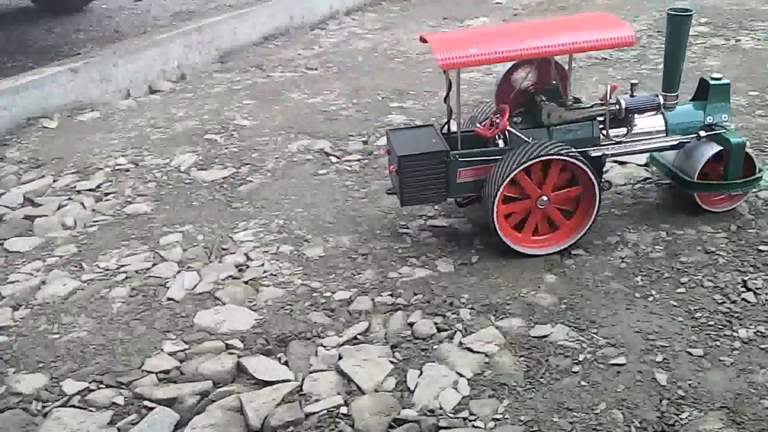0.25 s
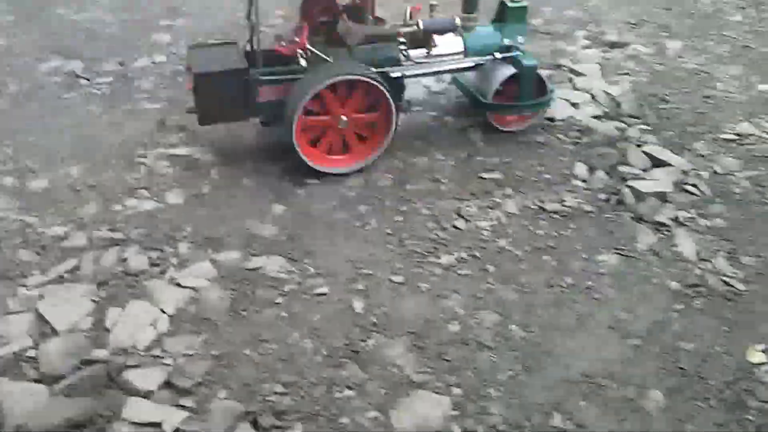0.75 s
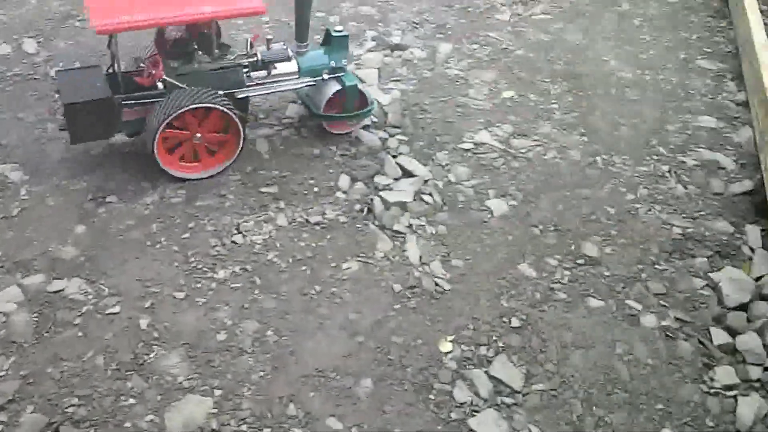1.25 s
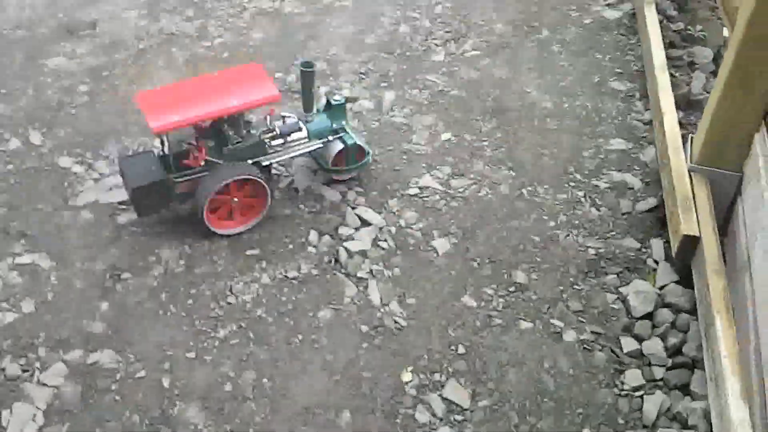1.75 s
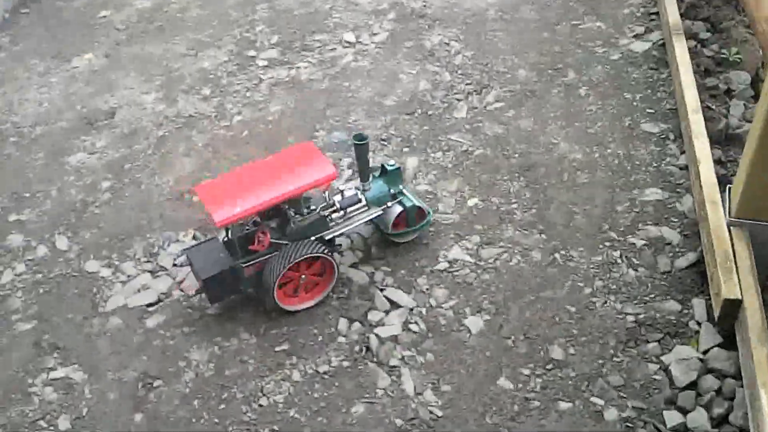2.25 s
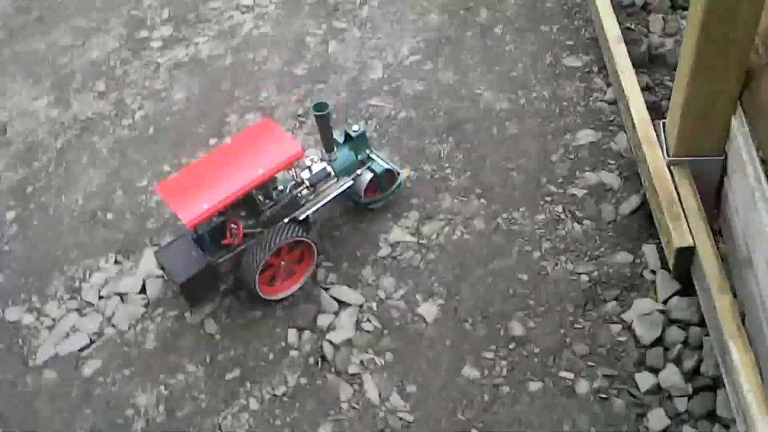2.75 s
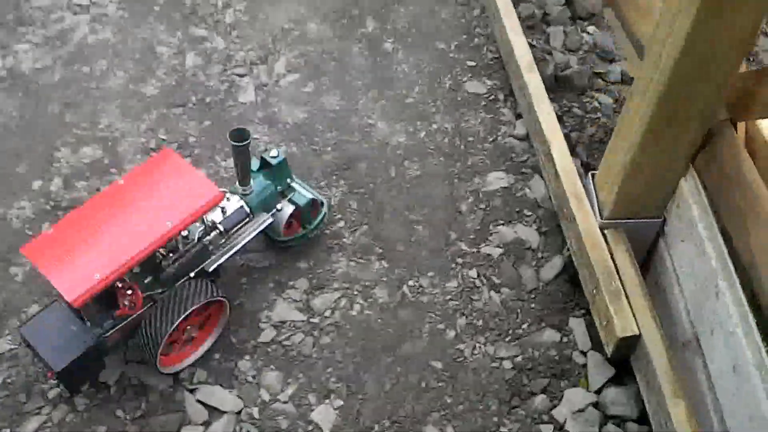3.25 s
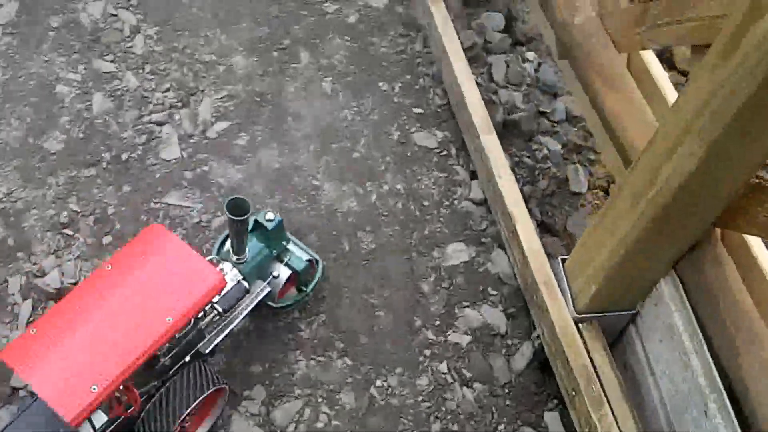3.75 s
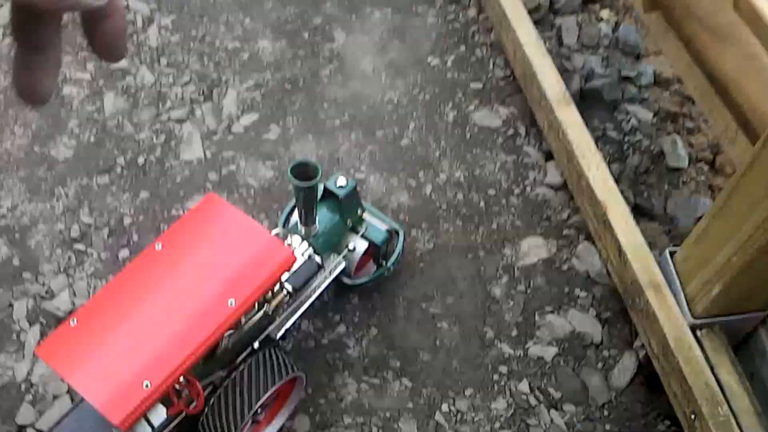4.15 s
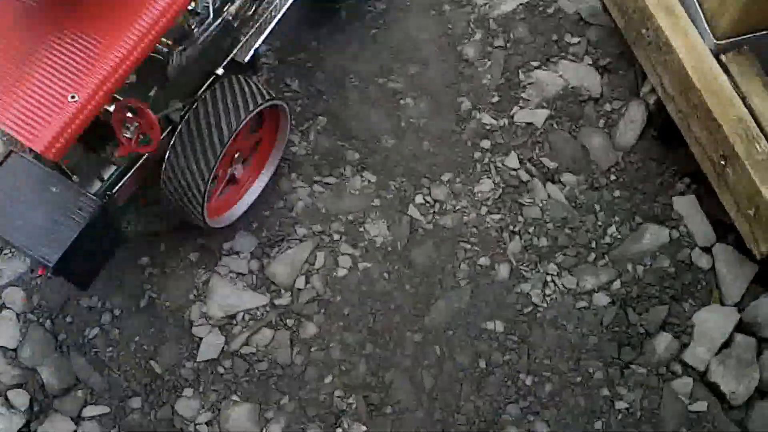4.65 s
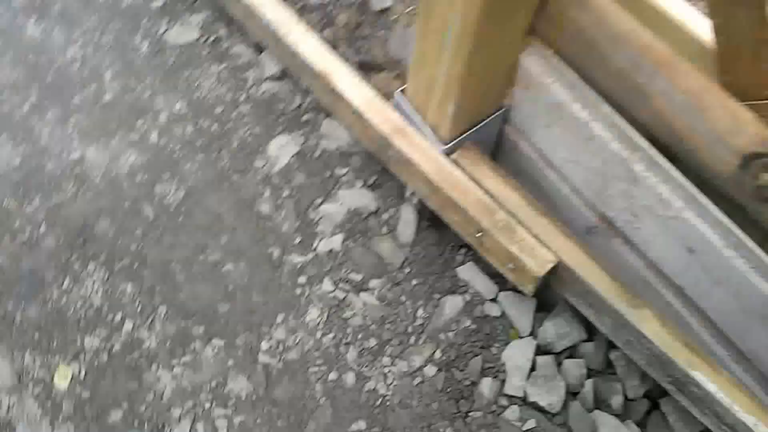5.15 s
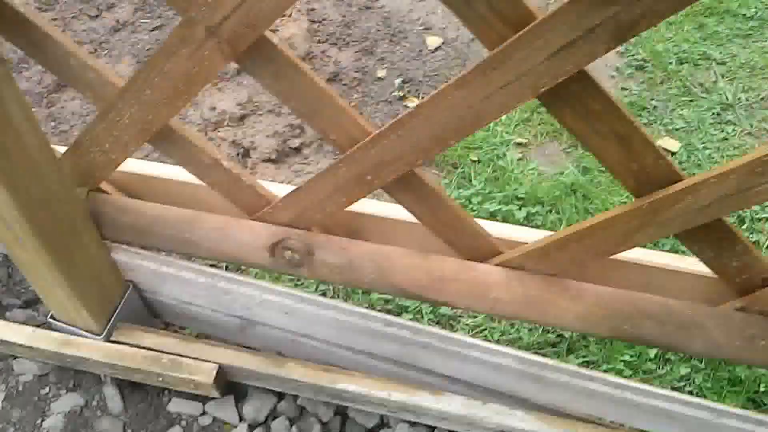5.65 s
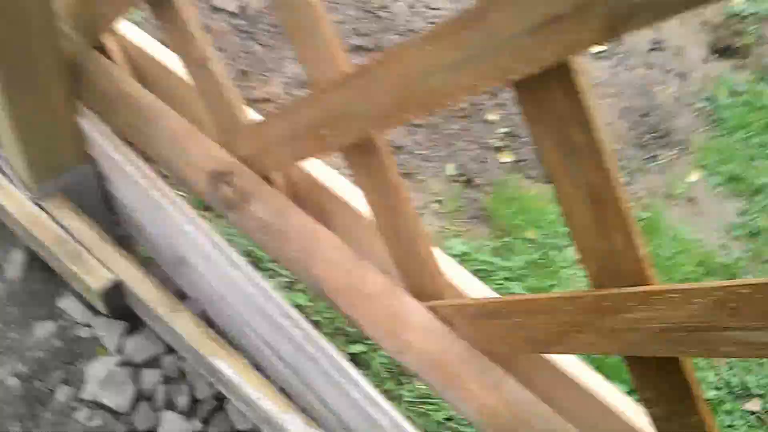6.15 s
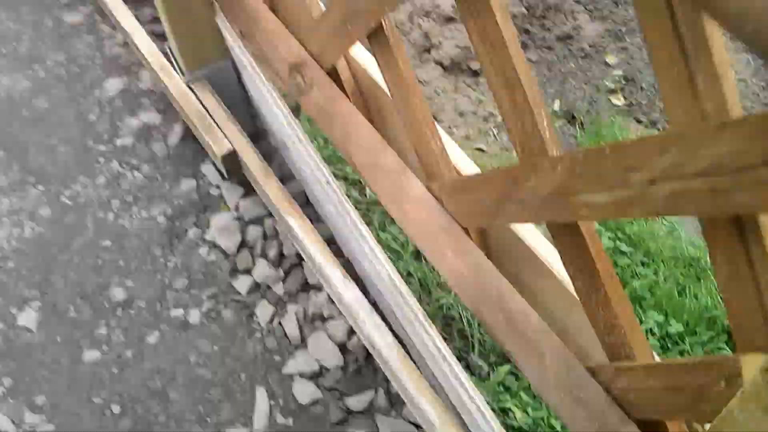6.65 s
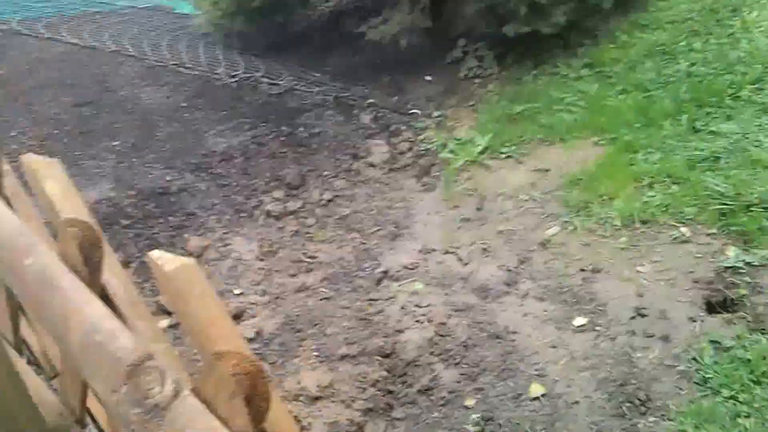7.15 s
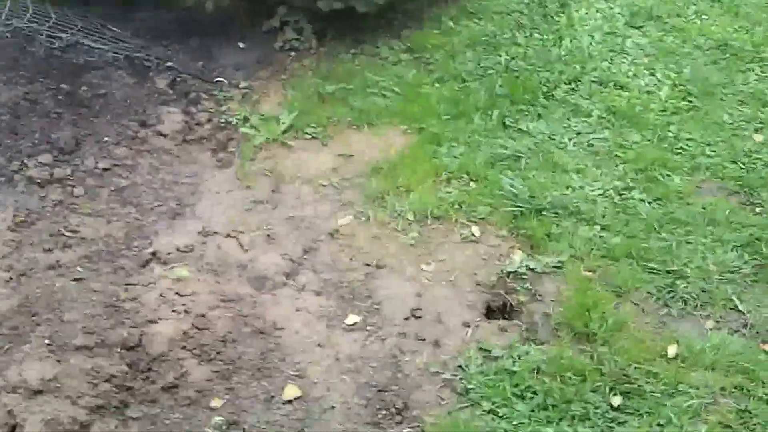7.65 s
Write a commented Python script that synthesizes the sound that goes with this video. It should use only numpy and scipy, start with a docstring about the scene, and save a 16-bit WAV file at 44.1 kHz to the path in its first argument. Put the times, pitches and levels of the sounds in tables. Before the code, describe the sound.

A model steam roller runs close by outdoors with a fast, even chuffing and tinny clatter, grit crunching under its wheels and loose steel jingling. Early on a stone snaps loudly and the sound dips for over a second. The rolling continues with ticks and clinks. After about five seconds the engine runs free and speeds up, with knocking linkage, rattling gears, a low hum and a thin squeal.

```python
"""A model steam roller clatters over gritty ground, close by outdoors, at about 18 crank turns a second.
Each power stroke chuffs and shakes the tin body, grit crunches under the wheels, loose steel jingles.
One loud stone snap early on makes the recorder duck for over a second.
After five seconds the engine loses its load and speeds up: the slack linkage knocks several times
a turn over a chassis hum, rattling gears and a thin squeal."""
import sys
import numpy as np
from scipy import signal
from scipy.fft import rfft, irfft
from scipy.io import wavfile
from scipy.ndimage import uniform_filter1d

SR = 44100
rng = np.random.default_rng(int(sys.argv[2]) if len(sys.argv) > 2 else 0)


def dump_mix(stems):
    """Bounce the given channels to the path in sys.argv[1] as a 16-bit WAV at rate SR."""
    frames = np.atleast_2d(stems).T  # one column per channel
    limited = np.clip(frames, -1, 1)  # hard clip at full scale
    pcm = np.round(limited * 32767).astype(np.int16)
    wavfile.write(sys.argv[1], SR, pcm)


N = 347508

# the machine's even running between surges: t/s, clatter/dB, rumble/dB, jingle/dB
RUNNING_LEVELS = [(0, -41, -55, -48), (0.7, -41, -45.5, -43.5), (1.9, -48, -52.5, -52),
                  (2.6, -39.5, -48.5, -44.5), (2.9, -44, -50.5, -49.5), (3.5, -39.5, -47.5, -48),
                  (4.0, -43.5, -47.5, -54.5), (4.3, -33.5, -39, -44), (4.6, -41, -48.5, -48),
                  (4.98, -35, -46.5, -54), (5.08, -43.5, -45, -54.5), (5.4, -46.5, -52, -54.5),
                  (6.1, -39, -43.5, -48), (6.5, -36, -45.5, -49), (7.3, -33, -38, -45),
                  (7.55, -40, -40, -44), (7.65, -44.5, -47, -45.5), (7.88, -33, -41, -47)]
# knocks in one turn with no load: start/turns, strength, rise/turns, decay/turns
FREE_STROKES = [(-.01, .7, .02, .06), (.14, .55, .025, .12), (.335, 1.6, .035, .1), (.49, .6, .03, .07),
                (.715, 1.55, .045, .08)]
# tin body resonances, under load and running light: f/Hz, width/Hz, lift/dB
LOADED_BODY = [(207, 320, 9), (430, 59, 11.5), (826, 180, 8), (1300, 13, 11), (1600, 17, 13), (1754, 66, 9),
               (2025, 66, 13), (2380, 56, 9), (5120, 320, 9.5)]
FREE_BODY = [(346, 40, 2), (647, 59, 5), (1337, 51, 2), (1800, 130, 4.5), (2520, 320, 6.5)]
# modes of the loose steel parts: f/Hz, level/dB, t60/s
STEEL_MODES = [(4860, -23, .07), (6150, -22, .07), (7950, -27, .07), (8330, -19.5, .11), (8600, -11, .025),
               (8685, -3, .046), (8775, -2.5, .036), (11210, -32, .09), (11375, -29, .13),
               (11510, -25, .085), (12855, -11.5, .042), (12900, -14, .02), (15070, -21, .05)]


def from_db(db):
    """Decibels to gain."""
    return 10 ** (np.asarray(db) / 20)


def rms_one(x):
    """Scale to unit power."""
    return x / np.sqrt(np.mean(x ** 2) + 1e-20)


def in_time(rows):
    """Breakpoint rows (time first) to one curve per remaining column."""
    times, *columns = np.transpose(rows)
    return [np.interp(np.arange(N) / SR, times, column) for column in columns]


def filtered(x, order, hz, kind="low"):
    """Butterworth low-, high- or band-pass."""
    return signal.sosfilt(signal.butter(order, hz, kind, fs=SR, output="sos"), x)


def drift(rate):
    """Smooth random wander of spread 1 that changes about rate times a second."""
    hop, settle = 40, 2000
    pole = np.exp(-2 * np.pi * rate * hop / SR)
    noise = rng.standard_normal(N // hop + settle + 2)
    slow = signal.lfilter([1], [1, -2 * pole, pole * pole], noise)[settle:]
    return np.interp(np.arange(N) / hop, np.arange(len(slow)), rms_one(slow))


def evened(x):
    """Hold the power steady over a tenth of a second, keeping the fast detail."""
    return x / np.sqrt(np.abs(uniform_filter1d(x ** 2, size=SR // 10)) + 1e-12)


def coloured(x, spectrum, resonances=(), size=4096):
    """Minimum-phase EQ of unit power gain: a smooth curve lifted by resonances."""
    hz = np.maximum(np.arange(size // 2 + 1) * SR / size, 1)
    curve_hz, curve_db = np.transpose(spectrum)
    db = np.interp(np.log(hz), np.log(curve_hz), curve_db)
    for centre, width, lift in resonances:
        db = db + lift / (1 + (2 * (hz - centre) / width) ** 2)
    cepstrum = irfft(np.log(from_db(db)))[:size // 2]
    response = irfft(np.exp(rfft(2 * cepstrum, size)))
    return signal.oaconvolve(x, response / np.linalg.norm(response))[:N]


def ring(clicks, hz, t60):
    """One mode: a unit click sets off a decaying sine of height 1."""
    pole, angle = from_db(-60 / (t60 * SR)), 2 * np.pi * hz / SR
    return signal.lfilter([0, np.sin(angle)], [1, -2 * pole * np.cos(angle), pole ** 2], clicks + 1e-18)


def grains(per_s, spread_db):
    """Random tiny contacts of uneven size; power 1."""
    sizes = from_db(spread_db * np.minimum(rng.exponential(1, N), 4)) * rng.choice([-1, 1], N)
    return rms_one(sizes * (rng.random(N) < per_s / SR))


def moving_band(hz, width_hz):
    """Noise in one resonance whose centre follows hz; power 1."""
    slow_noise = filtered(rng.standard_normal((2, N)), 1, width_hz / 2)
    real, imaginary = filtered(slow_noise, 2, 2 * width_hz)
    phase = 2 * np.pi * np.cumsum(hz) / SR
    return rms_one(real * np.cos(phase) + imaginary * np.sin(phase))


def surging_levels(release_s=0.02):
    """Clatter, rumble and jingle in dB: gravel crunches while rolling, rattle bursts running light."""
    # surges of clatter: t/s, length/s, rise/s, level/dB, rumble offset/dB, jingle offset/dB
    surges = [(-.01, 0.035, 0.0077, -34, -10, -12), (0.197, 0.081, 0.0058, -36, -20, -11),
              (0.408, 0.084, 0.0047, -39.5, -31, -11), (.503, 0.076, 0.0036, -36.5, -21, -4),
              (0.75, 0.092, 0.0032, -34, -13, -7), (0.952, 0.042, 0.0094, -31.5, -20, -5),
              (1.117, 0.08, 0.0041, -36.5, -18, -5), (1.206, 0.065, 0.0044, -37, -13, -3.5),
              (1.368, 0.1, 0.0049, -38.5, -18, -10), (1.483, 0.2, 0.005, -39.5, -19, -13),
              (1.688, 0.082, 0.021, -37.5, -18.5, -15), (1.986, 0.065, .002, -37.5, -14.5, -10),
              (2.16, 0.066, 0.0019, -39.5, -22, -12), (2.281, 0.15, 0.0078, -37, -30, -7.5),
              (2.551, 0.067, .003, -35.5, -13, -20), (2.723, 0.12, 0.0046, -38, -29, -22),
              (3.064, 0.061, 0.0033, -38.5, -13, -15), (3.117, 0.01, 0.0032, -34, -13, -15),
              (3.251, 0.08, 0.0073, -33.5, -10.5, -8.5), (3.399, 0.072, 0.0018, -30, -14.5, -17),
              (3.715, 0.092, 0.0029, -35, -24, -28), (3.818, 0.05, 0.014, -36.5, -13, -6),
              (4.028, 0.1, 0.029, -30, -12, -23), (4.384, 0.079, 0.0017, -28, -9.5, -16),
              (4.472, 0.019, .004, -33, -4, -15), (4.558, 0.0094, 0.002, -32.5, -29, -7),
              (4.628, 0.086, 0.007, -32.5, -20, -11.5), (4.858, 0.091, 0.053, -30, -17, -17),
              (5.11, 0.16, 0.017, -38, 2, -29), (6.252, 0.099, 0.06, -35, -12, -9.5),
              (6.603, 0.017, 0.01, -28, -14, -9), (7.551, 0.015, 0.0085, -26, -10, -15)]
    power = from_db(in_time(RUNNING_LEVELS)) ** 2
    for start, length, rise, db, rumble_offset, jingle_offset in surges:
        age = np.arange(N) / SR - start
        swell = np.clip(age / rise, 0, 1) * np.exp(-np.clip((age - length) / release_s, 0, 20))
        gains = from_db([[db], [db + rumble_offset], [db + jingle_offset]])
        power += (gains * swell) ** 2
    return 10 * np.log10(power)


def strokes(turns, pattern, uneven_db):
    """Pulses tied to the crank angle; no two turns are equally strong."""
    out = np.zeros(N)
    for start, strength, rise, decay in pattern:
        turn, angle = np.divmod(turns - start + 2, 1)
        force = strength * from_db(uneven_db * rng.standard_normal(size=256))[turn.astype(int)]
        out += force * np.minimum(angle / rise, 1) * np.exp(-np.maximum(angle - rise, 0) / decay)
    return out


def chuff_beat(turns, load, clatter_db):
    """The pulse of the power strokes under load; surges of clatter cover the puffs."""
    # puffs in one turn: start/turns, strength, rise/turns, decay/turns
    puffs = [(-.005, 1.5, .12, .115), (.35, .25, .09, .06), (.68, .42, .14, .3)]
    surge_db = clatter_db - in_time(RUNNING_LEVELS)[0]
    depth = np.sqrt(load) * from_db(-0.3 * surge_db)
    return 1 + depth * strokes(turns, puffs, uneven_db=2.6)


def clatter(load, beat, level_db):
    """Steam puffs, crunching grit and clumps of gear rattle sound through the tin body."""
    # tone under load and running light: f/Hz, level/dB
    loaded_eq = [(200, -27), (600, -12.5), (1000, 1.5), (1700, -2), (2800, -3), (4000, 2.5), (4600, -7.5),
                 (5500, 3.5), (7000, -2), (9000, -3.5), (10000, -10), (12500, -5.5), (15500, -41)]
    free_eq = [(200, -23), (600, -3.5), (1100, 2.5), (1700, 5.5), (2800, 4.5), (4000, 10.5), (5500, -2),
               (7000, 2.5), (8800, 2), (10300, -11), (12500, 1), (15500, -13.5)]
    contacts = grains(per_s=3500, spread_db=3.0) + 0.98 * rng.standard_normal(N)
    clumps = from_db(2.4 * drift(70))
    shaken = from_db(level_db) * evened(contacts * beat * clumps)
    loaded = coloured(shaken * np.sqrt(load), loaded_eq, LOADED_BODY)
    free = coloured(shaken * np.sqrt(1 - load), free_eq, FREE_BODY)
    return from_db(-2.57) * loaded + from_db(-6.5) * free


def hollow_note(load, beat, clatter_db):
    """Crunching under load sounds one hollow resonance that shifts as the roller moves."""
    # its centre: t/s, f/Hz
    glide = [(.6, 4240), (1.0, 3555), (2.7, 3734), (4.45, 3536)]
    note = moving_band(in_time(glide)[0], width_hz=260)
    return from_db(clatter_db - 8.5) * np.sqrt(load) * evened(beat * note)


def rumble(turns, load, beat, level_db):
    """The chassis shudders on rough ground; running light, it takes the same knocks on every turn."""
    # chassis tone: f/Hz, level/dB
    chassis_eq = [(30, -30), (60, -6), (130, -3), (250, -5.5), (450, 2), (750, -1), (1100, -6.5),
                  (2000, -16.5), (6000, -69)]
    roughness = grains(per_s=900, spread_db=0.5) + 0.5 * rng.standard_normal(N)
    jolts = evened(roughness * (beat + 1))
    kicks = sum(strength * np.diff(np.floor(turns - start - rise), prepend=-1)   # a click per stroke
                for start, strength, rise, _ in FREE_STROKES)
    blows = evened(jolts + 0.82 * (1 - load) ** 3 * rms_one(kicks))
    loaded = coloured(blows * np.sqrt(load), chassis_eq, LOADED_BODY)
    free = coloured(blows * np.sqrt(1 - load), chassis_eq, FREE_BODY)
    return from_db(level_db - 5.0) * (loaded + free)


def grit(beat, level_db, pitch_count=24, ring_cycles=45):
    """Crumbs of stone tick under the wheels, each with a brief pitch of its own."""
    cracks = evened(grains(per_s=420, spread_db=3.2) * beat) * from_db(level_db)
    pitch_index = rng.integers(0, pitch_count, N)
    pitches = np.geomspace(1500, 5600, pitch_count)
    ticks = sum(ring(cracks * (pitch_index == k), hz, ring_cycles / hz) * hz / pitches[-1]
                for k, hz in enumerate(pitches))
    return from_db(-15.5) * filtered(ticks, 2, 1200, "high")


def jingle(modes, shake, per_s, spread_db, clump_db):
    """Metal chatters with the shaking, each touch exciting the modes in new proportions."""
    touches = evened(grains(per_s, spread_db) * shake * from_db(clump_db * drift(24)))
    out, power = np.zeros(N), 0
    for hz, db, t60 in modes:
        out += from_db(db) * ring(touches * (1 + 0.52 * rng.standard_normal(N)), hz, t60)
        power += from_db(2 * db) * t60 * SR / (4 * np.log(1000))
    return out / np.sqrt(power)


def wheel_rims(beat, clatter_db, follow=0.57, reach_hz=250):
    """Grit and shaking ring the rims; single stones ping the modes that the struck spot favours."""
    # rim modes: f/Hz, level/dB, t60/s
    modes = [(2370, -9, .035), (3490, -3.5, .045), (3690, -3.5, .045), (4850, -.5, .065), (4930, -1, .055),
             (5260, -5, .035), (5560, -7, .06), (6120, -3.5, .065), (6205, -4, .065)]
    # rim chatter at average shaking: t/s, level/dB
    fader = [(0, -45.5), (0.6, -43), (1.0, -46), (2.0, -49), (2.6, -43), (3.7, -58.5), (4.3, -45),
             (5.5, -66), (6.3, -49), (7.88, -49)]
    # single stones: t/s, level/dB, favoured f/Hz
    stones = [(0.121, -29.5, 4890), (.21, -33, 4890), (.443, -32, 4890), (.755, -17, 5370),
              (1.556, -22, 5400), (2.505, -29.5, 6160), (2.608, -33, 4890), (2.693, -33, 4890),
              (3.514, -22.5, 5360), (4.288, -32, 4890)]
    level_db = in_time(fader)[0] + follow * (clatter_db - clatter_db.mean())
    out = from_db(level_db) * jingle(modes, beat, per_s=130, spread_db=3.8, clump_db=2.5)
    times, stone_db, favoured_hz = np.transpose(stones)
    for hz, db, t60 in modes:
        coupling = 1 / (1 + ((hz - favoured_hz) / reach_hz) ** 2)
        clicks = np.zeros(N)
        clicks[(times * SR).astype(int)] = from_db(stone_db + db) * coupling
        out += ring(clicks, hz, t60)
    return out


def outdoor_air():
    """A quiet bed of low outdoor noise with a trace of hiss."""
    # its tone: f/Hz, level/dB
    air_eq = [(25, -5), (65, 17.5), (130, 17), (250, 8), (600, -13), (2000, -75), (8000, -37), (15000, -32)]
    return from_db(-59.5) * coloured(rng.standard_normal(N), air_eq)


def tin_rasps(beat):
    """Dense slips crowd into the strokes and set one resonance of the tin sounding for a moment."""
    # rasps: t/s, length/s, level/dB, f/Hz, width/Hz
    rasps = [(0.02, 0.6, -54, 870, 149), (4.032, 0.096, -36.5, 1300, 700), (4.386, 0.13, -33.5, 1460, 800),
             (4.387, 0.072, -33, 3620, 300), (4.625, 0.11, -40.5, 1600, 220),
             (4.866, 0.099, -38.5, 1580, 222), (5.12, 0.207, -38.5, 1610, 1140),
             (6.282, 0.45, -50, 600, 129), (6.578, 0.41, -46, 1720, 200)]
    out = np.zeros(N)
    for start, length, db, hz, width in rasps:
        at, size = int(start * SR), int(length * SR)
        slips = beat[at:at + size] ** 2 * rng.standard_normal(size) * (rng.random(size) < .06)
        tone = filtered(slips, 2, [hz - width / 2, hz + width / 2], "band")
        out[at:at + size] += from_db(db) * rms_one(tone) * signal.windows.tukey(size, .4)
    return out


def steel_clinks(buzz_s=0.0073, size=1500):
    """Harder steel blows: a first contact, a brief buzz of rebounds, then the ring."""
    # blows: t/s, level/dB
    clinks = [(0.1216, -12), (0.352, -12.5), (0.5034, -8), (0.5847, -13), (1.257, -12), (1.858, -17),
              (2.2653, -19), (2.6217, -17), (2.7342, -13), (3.105, -13), (3.1306, -11), (3.26, -17),
              (3.409, -17), (3.47, -13), (3.8378, -11), (3.849, -17), (4.129, -15.5), (4.452, -20),
              (4.474, -14), (4.507, -13.5), (4.559, -17), (4.937, -14), (5.2465, -11), (5.2823, -5.5),
              (5.305, -10.5), (5.976, -6), (6.49, -8), (6.73, -11), (6.961, -10.5), (7.577, -8.5),
              (7.595, -8.5)]
    fade = np.exp(-np.arange(size) / SR / buzz_s)
    blows = np.zeros(N + size)
    for start, db in clinks:
        at = int(start * SR)
        buzz = 0.61 * rng.standard_normal(size) * (rng.random(size) < .08) * fade
        buzz[0] = 1
        blows[at:at + size] += from_db(db) * buzz
    blows = filtered(blows[:N], 2, 9800)   # heavier parts touch more softly
    rings = sum(from_db(db) * ring(blows * (1 + 0.13 * rng.standard_normal(N)), hz, t60)
                for hz, db, t60 in STEEL_MODES)
    return from_db(-19.0) * rings


def knocks(blows, scatter, jolt, order, size=8192):
    """Each blow is a short damped swing followed by a scatter of vibration about the same pitch."""
    age, out = np.arange(size) / SR, np.zeros(N + size)
    for start, db, hz, t60, width in blows:
        at = int(start * SR)
        band = [hz / (1 + width), min(hz * (1 + width), SR / 3)]
        noise = rms_one(filtered(rng.standard_normal(size), order, band, "band"))
        tail = noise * np.minimum(age * hz / 2, 1) * from_db(-60 * age / t60)
        swing = filtered(np.exp(-4 * np.pi * hz * age), order, band, "band")
        out[at:at + size] += from_db(db) * (scatter * tail - jolt * swing / swing.max())
    return out[:N]


def snaps_and_taps():
    """Snapping stones and hard taps: a sharp jolt with a light tail."""
    # snaps and taps: t/s, level/dB, f/Hz, t60/s, width/share of f
    snaps = [(.1222, -19, 5230, 0.013, 0.36), (.6155, 0, 1900, 0.012, 0.11),
             (.6156, -1.5, 4600, 0.021, 0.084), (.617, -9, 1110, 0.033, 0.55),
             (.6245, -4, 1700, .011, 0.37), (2.161, -23, 3770, 0.024, 0.27),
             (2.2662, -10, 2160, 0.022, 0.25), (2.2665, -14, 3480, 0.022, 0.11),
             (2.2667, -15, 6770, .025, 0.17), (2.553, -21, 3750, .03, 0.17), (2.565, -21, 3800, .04, .4),
             (2.7345, -13.5, 4300, .018, 0.4), (3.066, -26, 3820, 0.026, .25),
             (3.105, -19, 5300, 0.03, 0.11), (3.183, -17, 3820, .025, .2), (3.238, -14, 4200, 0.046, 0.22),
             (3.42, -12, 4000, .018, .3), (3.471, -14.5, 4650, 0.024, .25),
             (3.719, -18.5, 2800, 0.056, 0.5), (3.838, -23, 4400, .03, .4), (4.393, -11, 3450, 0.016, 0.17),
             (4.506, -12, 4400, 0.037, 0.27), (4.636, -19, 3450, 0.069, 0.16),
             (5.2672, -11.5, 625, 0.0082, .34), (5.282, -8.5, 5300, 0.0083, 0.33),
             (5.692, -18, 960, 0.025, 0.32), (5.862, -17.5, 3950, 0.01, 0.12),
             (6.768, -17, 5500, 0.025, .3)]
    return knocks(snaps, scatter=0.3, jolt=0.56, order=1)


def dull_bumps(width=0.33):
    """Low thuds with a fuller tail."""
    # bumps: t/s, level/dB, f/Hz, t60/s
    bumps = [(0.615, -20, 243, 0.05), (4.077, -31.5, 420, 0.23), (4.156, -33, 153, 0.068),
             (4.434, -21.5, 207, 0.05), (5.178, -23.5, 440, 0.051), (5.268, -27.5, 266, 0.045),
             (6.19, -29.5, 124, 0.15), (6.709, -42.5, 70, 0.19), (7.24, -27.5, 288, 0.17)]
    return knocks([(*bump, width) for bump in bumps], scatter=0.75, jolt=1, order=2)


def loud_crack(at_s=.6156, width_s=.00007):
    """The loudest snap opens with one sharp pressure pulse, enough to overload the recorder."""
    age = np.arange(N) / SR - at_s
    pulse = np.exp(-np.minimum((age / width_s) ** 2, 20))
    return -from_db(-2) * filtered(pulse, 1, 90, "high")


def chassis_hum(turns):
    """Knocks that repeat on every turn make the chassis hum on multiples of the crank speed."""
    # partials: multiple of the crank speed, level/dB
    partials = [(17, -4), (18, 0), (25, -2), (27, -1), (30, -4), (33, -3), (37, -4)]
    # the hum's swell: t/s, level/dB
    fader = [(4.9, -92), (5.8, -55.5), (6.9, -55), (7.35, -49.5), (7.88, -59)]
    tones = sum(from_db(db) * (1 + .35 * drift(4)) * np.sin(2 * np.pi * (order * turns + rng.random()))
                for order, db in partials)
    return from_db(in_time(fader)[0]) * rms_one(tones)


def linkage_rattle(slack, free_beat):
    """Rods and gears chatter and ring once the linkage goes slack."""
    # their modes: f/Hz, level/dB, t60/s
    modes = [(1340, -7, .03), (2730, -4, .025), (3190, -9, .05), (2480, -6, .025), (3740, 0, .018),
             (3920, 0, .016), (4830, -8, .04), (5550, -9, .05)]
    return from_db(-49) * slack * jingle(modes, free_beat, per_s=200, spread_db=3.0, clump_db=5.0)


def rod_clacks(rise_s=0.0018, decay_s=0.0082, size=4096):
    """A slack rod hits its pin and rebounds in a short dense burst."""
    # clacks: t/s, level/dB, f/Hz, width/share of f
    clacks = [(5.527, -40, 3870, .2), (5.912, -36, 3840, 0.54), (6.327, -30.5, 3500, 0.55),
              (6.607, -33, 1730, 0.097), (6.652, -32.5, 3710, .4), (6.844, -28, 2820, 1),
              (6.873, -33.5, 1700, .12), (6.899, -27.5, 3730, 0.37), (7.037, -33.5, 2700, .6),
              (7.131, -31.5, 3000, 0.58), (7.184, -31, 3930, 0.61), (7.238, -25.5, 3650, 0.7),
              (7.315, -29.5, 4000, 0.48), (7.365, -32.5, 3300, 0.75), (7.4754, -30, 3510, 0.65),
              (7.524, -31.5, 3560, .2)]
    age, out = np.arange(size) / SR, np.zeros(N + size)
    burst = np.minimum(age / rise_s, 1) * np.exp(-np.maximum(age - 2 * rise_s, 0) / decay_s)
    for start, db, hz, width in clacks:
        at = int(start * SR)
        noise = filtered(rng.standard_normal(size), 2, [hz / (1 + width), hz * (1 + width)], "band")
        out[at:at + size] += from_db(db) * burst * rms_one(noise)
    return out[:N]


def gear_whirr(beat):
    """The unloaded gear train spins and rattles in time with the crank."""
    # the rattle at speed: t/s, level/dB
    fader = [(6.0, -82), (6.28, -41.5), (7.55, -39), (7.7, -60)]
    # its tone: f/Hz, level/dB
    gear_eq = [(200, -7.5), (500, -8), (1200, -10.5), (4000, -12.5), (6000, -5), (7200, -8.5), (9000, -13),
               (10500, -15), (12600, -16), (15500, -28)]
    # gear resonances: f/Hz, width/Hz, lift/dB
    resonances = [(1730, 130, 10), (5850, 450, 5), (8950, 300, 9), (11420, 200, 5), (12870, 130, 12)]
    teeth = evened(grains(per_s=900, spread_db=3.0) * beat ** 1.3 * from_db(2.5 * drift(90)))
    return coloured(teeth * from_db(in_time(fader)[0]), gear_eq, resonances)


def squeal(beat, waver_hz=70):
    """A thin rubbing sizzle that wavers in pitch and catches with the strokes."""
    # its course: t/s, f/Hz, level/dB
    course = [(6.1, 8940, -76), (6.42, 8960, -36.5), (6.6, 8860, -49), (7.17, 9210, -41), (7.55, 8980, -50),
              (7.65, 8860, -80)]
    hz, db = in_time(course)
    sizzle = moving_band(hz + waver_hz * drift(24.5), width_hz=170)
    return from_db(db) * evened(np.sqrt(beat) * sizzle)


def scene():
    """The crank drives every part of the machine, first rolling, then running light, over quiet air."""
    # crank: t/s, speed/(turns per s)
    crank_speed = [(0, 17.132), (2.1, 17.9), (2.9, 17.808), (4.9, 18.489), (5.6, 19.094), (6.2, 20.06),
                   (7.4, 20.934), (7.88, 21.062)]
    # load on the engine: t/s, share/0-1
    engine_load = [(0, 0.93), (4.9, 0.36), (5.15, 0.28), (5.35, 0.03), (7.88, 0)]
    turns = np.cumsum(in_time(crank_speed)[0]) / SR
    load = np.clip(in_time(engine_load)[0], 0, 1)
    slack = np.clip(1 - load / .25, 0, 1)   # the linkage loosens below a quarter load
    clatter_db, rumble_db, steel_db = surging_levels()
    loaded_beat = chuff_beat(turns, load, clatter_db)
    free_beat = .85 + strokes(turns, FREE_STROKES, uneven_db=2.5)
    beat = (1 - slack) * loaded_beat + slack * free_beat

    body = clatter(load, beat, clatter_db) + hollow_note(load, beat, clatter_db)
    body += rumble(turns, load, beat, rumble_db)
    racing = gear_whirr(beat) + squeal(beat) + chassis_hum(turns)
    metal = from_db(steel_db) * jingle(STEEL_MODES, beat, per_s=280, spread_db=2.5, clump_db=3.5)
    metal += wheel_rims(beat, clatter_db) + linkage_rattle(slack, free_beat)
    hits = loud_crack() + steel_clinks() + rod_clacks() + snaps_and_taps() + dull_bumps()
    air = outdoor_air()
    scrapes = (1 - slack) * grit(beat, clatter_db) + tin_rasps(beat)
    return (body + racing + metal + hits + air + scrapes)[None]


def record(dry, limit_db=-5, deepest_cut_db=15.5, attack_s=0.0019, recover_db_per_s=12.5, top_hz=15600):
    """A small recorder: its limiter ducks at a loud peak and recovers slowly; the top is cut steeply."""
    over_db = 20 * np.log10(np.abs(dry) + 1e-9) - limit_db
    wanted_cut_db = np.clip(5.0 * over_db, 0, deepest_cut_db)
    recovery_db = recover_db_per_s * np.arange(N) / SR
    held_cut_db = np.maximum.accumulate(wanted_cut_db + recovery_db, axis=1) - recovery_db
    pole = np.exp(-1 / (attack_s * SR))
    cut_db = signal.lfilter([1 - pole], [1, -pole], held_cut_db)
    limited = np.tanh(dry * from_db(-cut_db))
    return signal.sosfilt(signal.ellip(10, .2, 80, top_hz, fs=SR, output="sos"), limited)


dry = scene()
out = record(dry)
dump_mix(out)
```